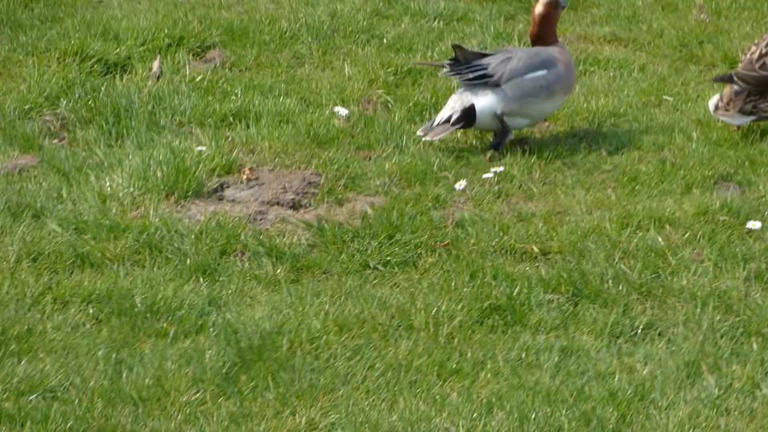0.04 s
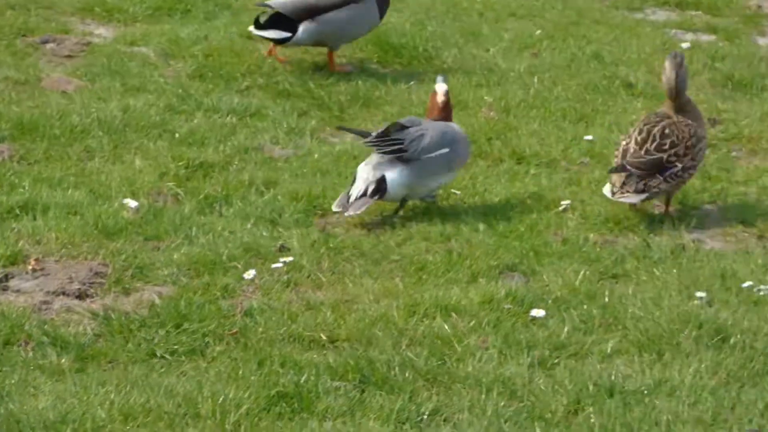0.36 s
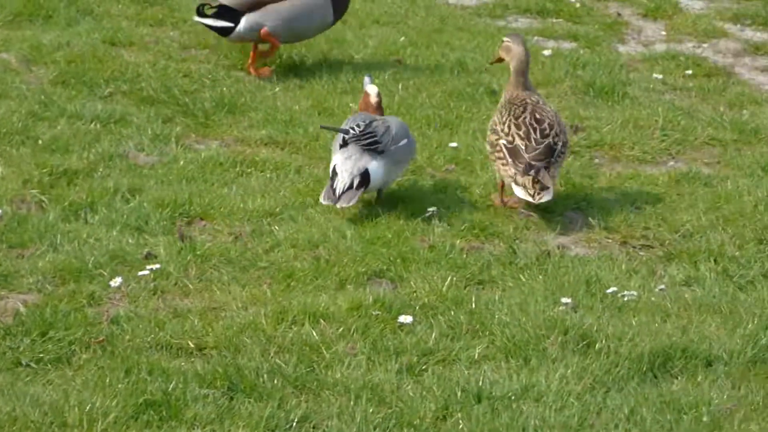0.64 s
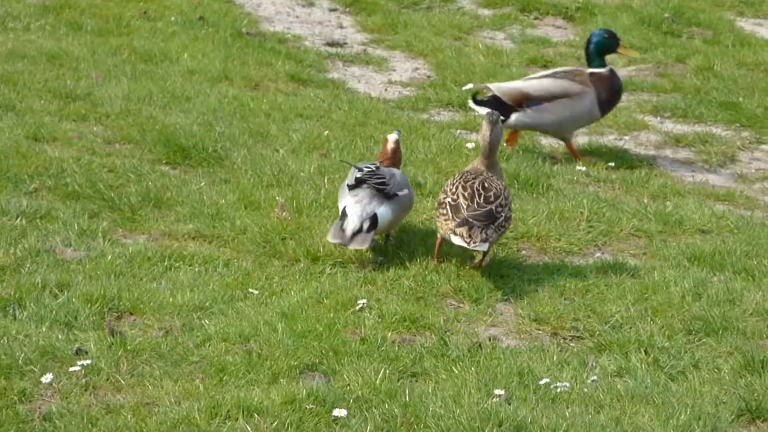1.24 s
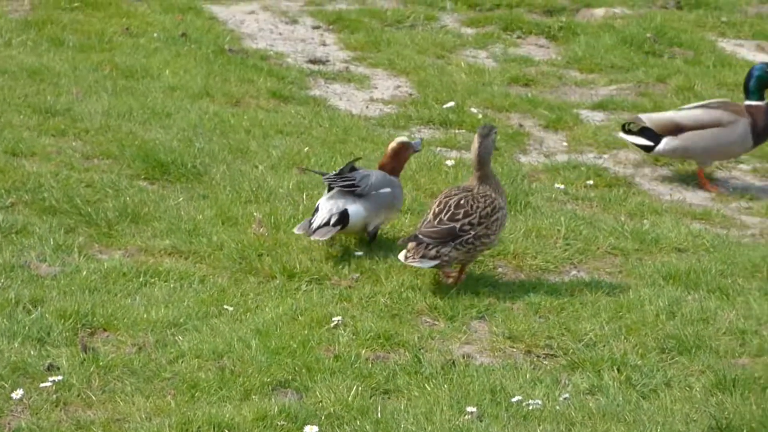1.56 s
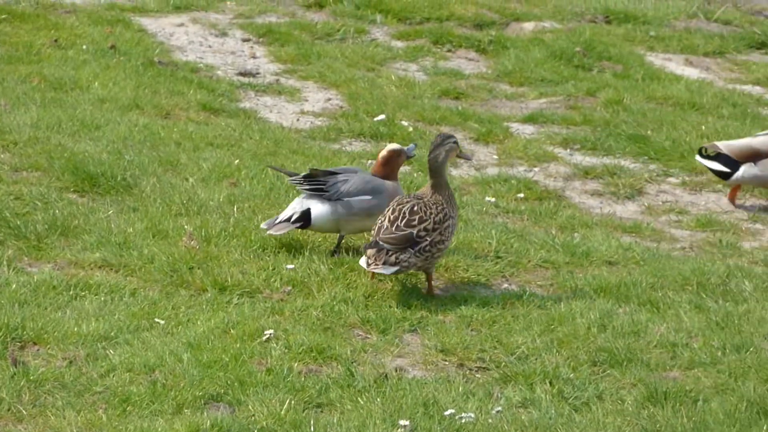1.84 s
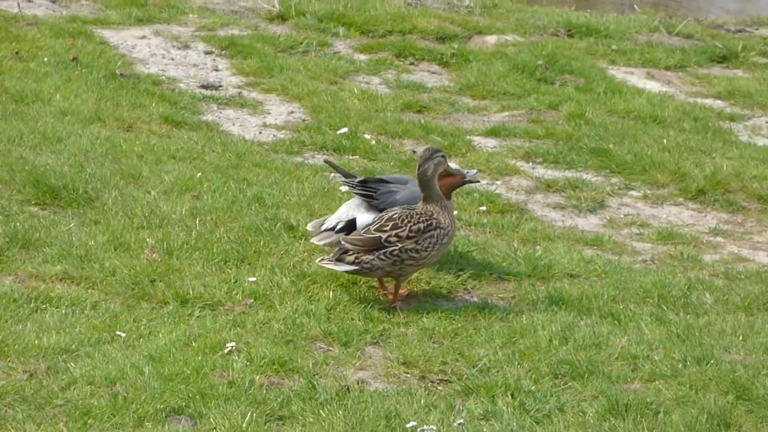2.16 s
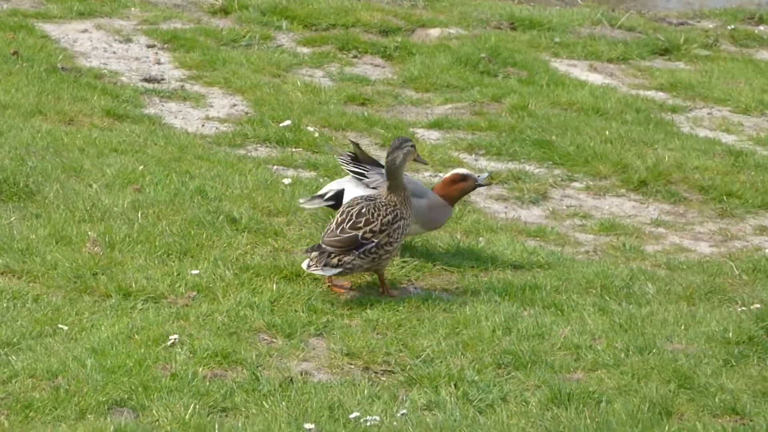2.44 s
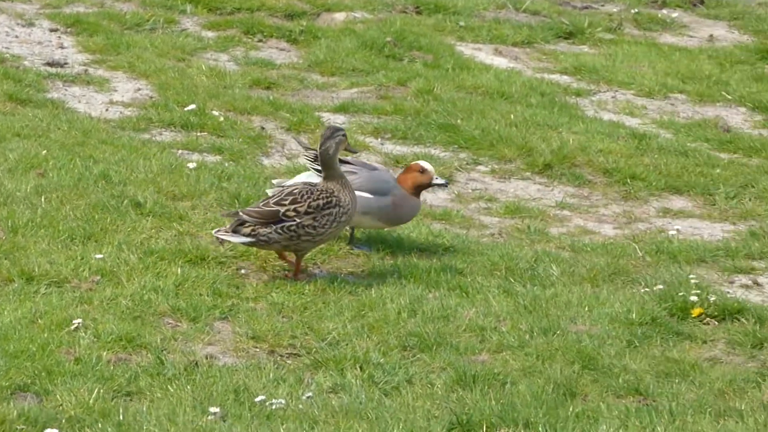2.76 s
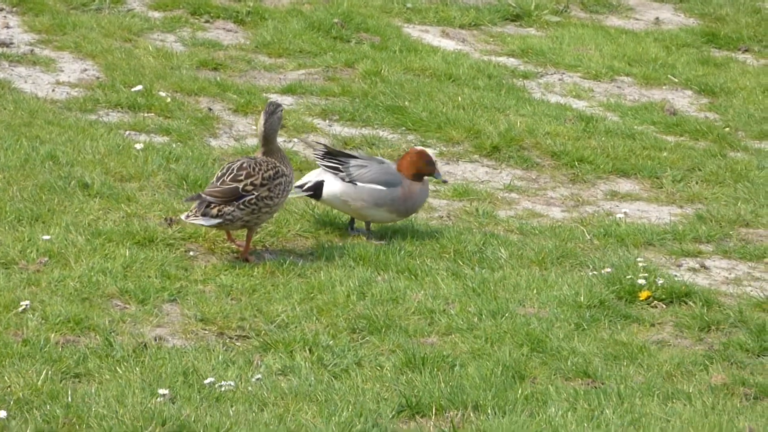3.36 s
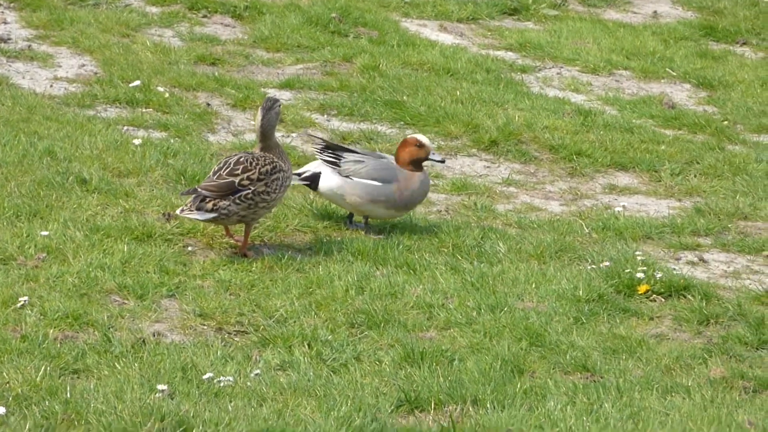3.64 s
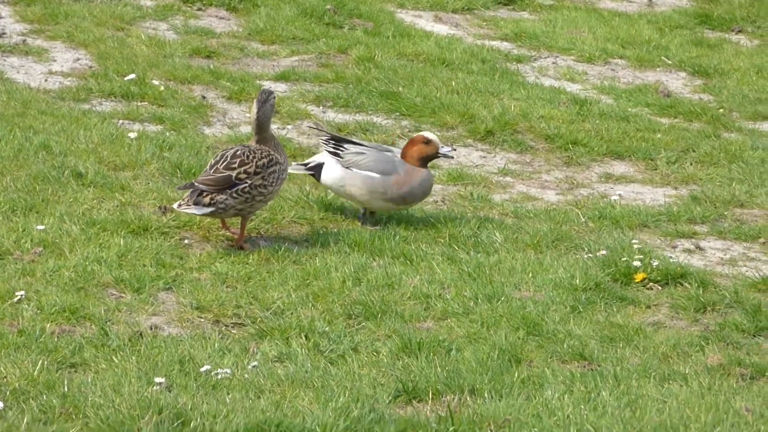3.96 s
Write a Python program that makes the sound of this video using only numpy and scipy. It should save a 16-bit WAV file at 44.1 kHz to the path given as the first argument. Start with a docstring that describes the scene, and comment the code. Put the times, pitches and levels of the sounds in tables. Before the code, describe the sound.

A run of short, rattling duck quacks with occasional whistles and some wind rumble.

```python
"""Short rattling quacks rise out of faint outdoor air and keep running as ducks walk over a lawn.
Each quack is a pulse train coloured by throat and beak; a second duck chatters and clucks more softly.
Beaks and feet tick and knock, and a wigeon adds three arched whistles, their pitch clinging to its
windpipe's resonances, and a few thin squeaks. Wind rumbles on the microphone in the second half,
and near the end a small bird pipes far off."""
import sys
import numpy as np
from scipy import signal
from scipy.fft import rfft, irfft, next_fast_len
from scipy.io import wavfile
from scipy.ndimage import map_coordinates

SR = 44100
rng = np.random.default_rng(int(sys.argv[2]) if len(sys.argv) > 2 else 0)


def unload_wav(signal):
    """Save mono or channel-first audio to the path in sys.argv[1] as 16-bit WAV at rate SR, clipped to [-1, 1]."""
    wavfile.write(
        sys.argv[1],
        SR,
        np.round(np.clip(np.atleast_2d(signal).T, -1, 1) * 32767).astype(np.int16),
    )


N = 176400


def amp(db):
    """Decibels to amplitude ratio."""
    return 10 ** (np.asarray(db) / 20)


def unit(x):
    """Normalisation to rms 1."""
    return x / np.sqrt(np.mean(x ** 2) + 1e-20)


def clock():
    """Sample times in seconds."""
    return np.arange(N) / SR


def along(points, hz):
    """Interpolation of (frequency_hz, value) points on a log frequency axis."""
    f, v = np.transpose(points)
    return np.interp(np.log(hz + 1), np.log(f + 1), v)


def filtered(x, response):
    """Linear filtering: the spectrum times a frequency response."""
    size = next_fast_len(N + SR // 2)
    return irfft(rfft(x, size) * response(np.fft.rfftfreq(size, 1 / SR)), size)[..., :N]


def colour(x, points):
    """Spectral shaping by a (frequency_hz, gain_db) curve."""
    return filtered(x, lambda hz: amp(along(points, hz)))


def noise(points):
    """Coloured noise of rms 1."""
    return unit(colour(rng.standard_normal(N), points))


def wobble(knots_per_s):
    """Smooth random modulation: a spline through Gaussian values."""
    return map_coordinates(rng.standard_normal(N // 8), [clock() * knots_per_s], mode="wrap")


def swell(dt, rise, fall, steep):
    """A rounded envelope: 1 at dt = 0, 1/e at -rise and +fall."""
    return np.exp(-np.minimum(np.abs(dt / np.where(dt < 0, rise, fall)), 10) ** steep)


def decay(start_s, t60_s):
    """Exponential decay from a sudden onset."""
    return (clock() >= start_s) * amp(-60 * np.abs(clock() - start_s) / t60_s)


def phase_of(hz):
    """Phase in radians, the integral of frequency."""
    return 2 * np.pi * np.cumsum(hz) / SR


def pan(x, db):
    """Direction by level difference; positive is left."""
    return x * amp([[db / 2], [-db / 2]])


def spread(points, side_db):
    """Partly coherent stereo noise from independent mid and side signals."""
    return unit(noise(points) + amp(side_db) * noise(points) * np.array([[1], [-1]]))


# spectrum of the outdoor air: frequency_hz, gain_db
AIR_SPECTRUM = [(60, -25.5), (190, 5), (330, -6), (900, -9), (1700, -6.5), (5000, -22.5), (9500, -25),
                (15500, -42)]
def air(level_db=-46.5):
    """Ambient noise: a broad spectrum whose level wavers slightly."""
    return amp(level_db + wobble(5.19)) * spread(AIR_SPECTRUM, side_db=-6.5)


# throat resonances and spectrum of the buzz: frequency_hz, gain_db
THROAT_RESPONSE = [(300, -30), (1300, -34), (1650, 0.5), (1850, -5.5), (2050, -2), (2450, -17.5),
                   (6000, -35)]
BUZZ_SPECTRUM = [(800, -18), (1350, -1), (2000, 0), (2380, -10), (2720, 3), (3100, -10), (3420, 0),
                 (3900, -26), (12000, -70)]
def rattle(calls, pulses_per_s, beak_response, steep, rasp_db, buzz_db):
    """Source and filter: each pulse is a throat tone burst, a buzz and a bright slap through the beak."""
    jitter_s, scatter_db, pitch_scatter, sag_per_s = .0005, 1.8, .055, 1.0
    burst_s, afterbeat_delay_s, afterbeat_db, buzz_s = .0017, .0032, -16, .0017
    slap_s, slap_delay_s, sweep_hz, sweep_hz_per_s = .0021, .0023, 4500, 1500000
    tone, buzz, rasp = np.zeros((3, N + SR))
    t = np.arange(-SR // 100, SR // 100) / SR
    slap_t = t - slap_delay_s
    slap_shape = swell(slap_t, slap_s, 1.4 * slap_s, 1.1)
    buzz_shape = swell(t - slap_delay_s / 2, buzz_s, 1.4 * buzz_s, 1.3)
    afterbeat_shape = swell(t - afterbeat_delay_s, burst_s, burst_s, 2)
    for peak_s, rise, fall, db, hz, bright_db in calls:
        for pulse in range(-8, 9):
            jitter, size, detune, length, flick, phase, rebound = rng.standard_normal(7)
            dt = pulse / pulses_per_s + jitter_s * jitter
            force = swell(dt, rise, fall, steep)
            gain = amp(db + scatter_db * size) * force
            cycles = hz * (1 + pitch_scatter * detune - sag_per_s * dt) * t
            burst_shape = swell(t, burst_s * np.exp(length / 4), burst_s, 2)
            burst = burst_shape * np.sin(2 * np.pi * (cycles + phase))
            afterbeat = afterbeat_shape * np.sin(2 * np.pi * (cycles + flick))
            sweep_cycles = sweep_hz * slap_t + sweep_hz_per_s * np.exp(flick / 2) * slap_t ** 2 / 2
            sweep = np.sin(2 * np.pi * (sweep_cycles + phase))
            slap = slap_shape * (rng.standard_normal(len(t)) + sweep / 2)
            first = round((peak_s + dt) * SR) - len(t) // 2
            span = slice(first, first + len(t))
            tone[span] += 2.34 * gain * (burst + amp(afterbeat_db + 3 * rebound) * afterbeat)
            buzz[span] += gain * amp(buzz_db + .13 * bright_db) * buzz_shape * rng.standard_normal(len(t))
            rasp[span] += gain * force ** .5 * amp(rasp_db + bright_db) * slap
    return (colour(tone[:N], THROAT_RESPONSE) + colour(buzz[:N], BUZZ_SPECTRUM)
            + colour(rasp[:N], beak_response))


# first duck's calls: peak_s, rise_s, fall_s, relative_level_db, throat_hz, brightness_db
QUACK_CALLS = [(.334, 0.06, 0.047, -35, 1760, -11), (.4605, 0.032, 0.038, -24.5, 1820, -4),
               (.618, 0.053, 0.032, -25, 1806, -5.5), (.910, 0.052, 0.021, -26.5, 1774, -0.5),
               (1.050, 0.037, 0.052, -26.5, 1776, -0.5), (1.369, 0.046, 0.033, -27, 1840, 0),
               (1.533, 0.05, 0.029, -27, 1820, -1), (1.819, 0.055, 0.032, -25.5, 1885, -1),
               (1.991, 0.054, 0.039, -25.5, 1850, -0.5), (2.267, 0.043, 0.038, -27, 1890, -6.5),
               (2.451, 0.036, 0.064, -25, 1900, -7), (2.756, 0.065, 0.018, -27.5, 1770, -8),
               (2.877, 0.041, 0.056, -26.5, 1946, -8), (3.170, 0.048, 0.033, -25, 1905, -13.5),
               (3.328, 0.057, 0.042, -27, 1947, -8.5), (3.604, 0.045, 0.033, -25, 1833, -11),
               (3.792, 0.048, 0.035, -25, 1946, -7)]
# its beak resonances: frequency_hz, gain_db
QUACK_BEAK_RESPONSE = [(500, -14), (900, -22.5), (1350, 2), (2300, -4), (3400, -13.5), (4000, -18),
                       (4600, -12), (4830, -14), (5200, -7), (5550, -14.5), (6200, -6.5), (7200, -17),
                       (8500, -22), (15000, -82)]
def quacks():
    """Pulse trains slow enough to be heard as a rattle."""
    return rattle(QUACK_CALLS, 113, QUACK_BEAK_RESPONSE, steep=3.14, rasp_db=6, buzz_db=3)


# sharp contacts of beaks and feet: start_s, relative_level_db
TICK_IMPACTS = [(0.418, -36.5), (0.7003, -27.5), (3.253, -36), (3.733, -40)]
def ticks(t60_s=.011, gain_db=-2.5):
    """Impact transients: broadband noise that decays almost at once."""
    crack = noise([(200, -6), (2000, 4.5), (8500, -4), (14000, -17)])
    return crack * sum(amp(db + gain_db) * decay(start_s, t60_s) for start_s, db in TICK_IMPACTS)


# second duck's calls: peak_s, half_length_s, relative_level_db
CHATTER_CALLS = [(.548, 0.041, -43), (0.699, 0.036, -43.5), (0.835, 0.041, -44), (1.199, 0.036, -40.5),
                 (1.427, 0.036, -37.5), (1.577, 0.041, -37.5), (1.713, 0.047, -38.5), (2.104, 0.033, -40),
                 (2.217, 0.036, -39.5), (3.092, 0.075, -39.5), (3.534, 0.063, -40), (3.931, 0.025, -41.5)]
# its beak resonances: frequency_hz, gain_db
CHATTER_BEAK_RESPONSE = [(500, -21.5), (1250, 1.5), (2200, 11.5), (2900, -0.5), (3600, -15.5), (5500, -9),
                         (6500, -5.5), (7800, -17.5), (15000, -48)]
def chatter(throat_hz=2166, dulling_db_per_s=2.5):
    """Softer pulse trains whose rasp weakens from call to call, dulling the timbre."""
    calls = [(s, half, half, db, throat_hz, -dulling_db_per_s * s) for s, half, db in CHATTER_CALLS]
    return rattle(calls, 103, CHATTER_BEAK_RESPONSE, steep=5.3, rasp_db=10, buzz_db=9)


# wigeon's calls: crest_s, rise_s, fall_s, crest_hz, relative_level_db, hiss_db, pan_db
WHISTLE_ARCHES = [(0.634, 0.034, 0.028, 2923, -30, -9.5, 2), (1.655, .035, 0.024, 2716, -34, -16, 1.6),
                  (2.804, .031, .027, 2983, -30.5, -5.5, 1.5)]
# harmonics 2 to 4: relative_level_db
WHISTLE_HARMONICS = [-5.5, -13, -30]
# beak resonances and spectrum of the hiss: frequency_hz, gain_db
WHISTLE_BEAK_RESPONSE = [(2000, 8.5), (3000, 2.5), (3700, 3.5), (5000, 1.5), (5900, -8.5), (7300, -23),
                         (9300, 9), (12000, 7.5), (13000, -35)]
HISS_SPECTRUM = [(1000, -6), (5000, -0.5), (8000, 2.5), (9600, 5), (10700, -16), (12000, -13), (13000, -60)]
def whistles(foot_hz=1189, jump_hz=2030, spacing_hz=650, pull_hz=75, roughness=.012):
    """Frequency pulling: an arching pitch clings to the windpipe's resonances and jumps between them."""
    out = np.zeros((2, N))
    for crest_s, rise, fall, crest_hz, db, hiss_db, pan_db in WHISTLE_ARCHES:
        dt = clock() - crest_s
        arch_hz = foot_hz + (crest_hz - foot_hz) * swell(dt, rise, fall, 2.2)
        mode_angle = 2 * np.pi * (arch_hz - jump_hz) / spacing_hz
        pitch_hz = arch_hz + pull_hz * (np.sin(mode_angle) + np.sin(2 * mode_angle) / 2)
        phase = phase_of(pitch_hz * (1 + roughness * wobble(1100)))
        overtones = sum(amp(level + 3 * wobble(400)) * np.sin(k * phase)
                        for k, level in enumerate(WHISTLE_HARMONICS, 2))
        tone = np.sqrt(2) * (np.sin(phase) + overtones)
        flutter = amp(1.2 * wobble(200) + 1.2 * wobble(1200))
        voice = colour(tone * flutter * swell(dt, .93 * rise, .93 * fall, 3.8), WHISTLE_BEAK_RESPONSE)
        hiss = amp(hiss_db) * noise(HISS_SPECTRUM) * swell(dt, 1.16 * rise, 1.16 * fall, 4.8)
        out += pan(amp(db) * (voice + hiss), pan_db)
    return out


def thin_notes(notes, harmonics_db, roughness, hiss_db):
    """Frequency and amplitude modulation: fluttering tones on a shallow pitch arch, in a puff of hiss."""
    out = np.zeros(N)
    hiss = amp(hiss_db) * noise(HISS_SPECTRUM)
    waver = 1 + roughness * wobble(700)
    flutter = amp(2 * wobble(250))
    for crest_s, half, crest_hz, width, db in notes:
        dt = clock() - crest_s
        phase = phase_of(crest_hz * swell(dt, width, width, 2) * waver)
        tone = sum(amp(level) * np.sin(k * phase) for k, level in enumerate(harmonics_db, 1))
        puff = hiss * swell(dt, 1.6 * half, 1.6 * half, 3)
        out += amp(db) * flutter * (np.sqrt(2) * tone * swell(dt, half, half, 5) + puff)
    return out


# wigeon's squeaks: crest_s, half_length_s, crest_hz, arch_half_width_s, relative_level_db
SQUEAK_NOTES = [(.66, 0.027, 1440, 0.081, -45), (.805, 0.048, 1484, 0.1, -42.5),
                (.962, 0.029, 1327, 0.13, -43), (2.968, 0.027, 1500, 0.058, -43)]
# harmonics 1 to 6: relative_level_db
SQUEAK_HARMONICS = [-3, 0, -30, -25, -26, -20]
def squeaks():
    """A harmonic series that sounds thin, its octave stronger than its fundamental."""
    return thin_notes(SQUEAK_NOTES, SQUEAK_HARMONICS, roughness=.0021, hiss_db=-11)


# dull contacts of beaks and feet: start_s, relative_level_db, pitch_hz
KNOCK_IMPACTS = [(0.702, -35.5, 483), (1.05, -37, 617)]
def knocks(t60_s=.074, gain_db=6, roughness=.21):
    """Damped oscillation: each impact rings briefly at a low, blurred pitch."""
    out = np.zeros(N)
    for start_s, db, hz in KNOCK_IMPACTS:
        pitch_hz = (clock() >= start_s) * hz * (1 + roughness * wobble(610))
        out += amp(db + gain_db) * decay(start_s, t60_s) * np.sin(phase_of(pitch_hz))
    return out


# gusts on the microphone: peak_s, half_length_s, relative_level_db
WIND_GUSTS = [(1.17, 0.12, -52), (2.28, 0.57, -51), (2.483, 0.019, -35.5), (2.567, 0.042, -39),
              (2.72, 0.067, -37), (2.894, 0.14, -37), (3.079, 0.021, -42.5), (3.389, 0.096, -36.5),
              (3.653, 0.44, -53), (3.9, 0.023, -40.5)]
# spectrum of their rumble: frequency_hz, gain_db
WIND_SPECTRUM = [(25, -61), (60, -20.5), (140, 3.5), (310, 0), (500, -9.5), (1000, -27.5), (3000, -53)]
def wind(lumps_db=2, gain_db=4):
    """Turbulent pressure: lumpy gusts add in power and are nearly incoherent at the microphone's ports."""
    power = sum((amp(db) * swell(clock() - s, half, half, 2.84)) ** 2 for s, half, db in WIND_GUSTS)
    return np.sqrt(power) * amp(gain_db + lumps_db * wobble(45)) * spread(WIND_SPECTRUM, side_db=-2)


# second duck's clucks: peak_s, half_length_s, relative_level_db
CLUCK_NOTES = [(1.261, 0.024, -35), (1.47, 0.0099, -34.5), (1.891, 0.0067, -32), (2.195, 0.021, -35),
               (2.364, 0.0075, -37), (2.589, 0.017, -33), (2.95, 0.022, -38)]
def clucks(pitch_hz=1590, fall_per_s=2, octave_db=-22):
    """Jitter and shimmer: fast random changes of pitch and level make short notes hoarse."""
    out = np.zeros(N)
    waver, flutter_db = .11 * wobble(1300), 4.5 * wobble(500)
    for peak_s, half, db in CLUCK_NOTES:
        dt = clock() - peak_s
        phase = phase_of(pitch_hz * (1 - fall_per_s * dt + waver))
        tone = np.sin(phase) + amp(octave_db) * np.sin(2 * phase)
        out += amp(db + flutter_db) * swell(dt, half, half, 2.3) * tone
    return out


# small bird's note: crest_s, half_length_s, crest_hz, arch_half_width_s, level_db
FAR_BIRD_NOTES = [(3.69, 0.059, 3380, 0.29, -53.5)]
def far_bird():
    """A nearly pure tone, faint with distance."""
    return thin_notes(FAR_BIRD_NOTES, [0], roughness=.0045, hiss_db=-35)


def convolved(x, impulse):
    """Convolution with a stereo impulse response, scaled to unit energy on the left."""
    return signal.fftconvolve(x, impulse / np.linalg.norm(impulse[0]), axes=1)[:, :N]


def lawn_reflection(x, scatter_s=.0012):
    """Scattering: the lawn returns a very short reflection, different in each channel."""
    t = np.arange(SR // 100) / SR
    return convolved(x, rng.standard_normal((2, len(t))) * t * np.exp(-2 * t / scatter_s))


# reverberation time of the surroundings: frequency_hz, t60_s
YARD_DECAY = [(300, 0.56), (10000, 0.017)]
def yard_reverb(x):
    """Diffuse reverberation: a noise tail whose treble decays fastest."""
    hz, t, spectra = signal.stft(rng.standard_normal((2, SR // 2)), SR, nperseg=256)
    fading = amp(-60 * t / along(YARD_DECAY, hz)[:, None])
    return convolved(x, signal.istft(spectra * fading, SR, nperseg=256)[1])


def scene():
    """Superposition: ducks close together, nearly straight ahead, with reflections, bird, wind and air."""
    ducks = pan(quacks(), db=-2.5) + pan(chatter(), db=6.3)
    ducks += pan(clucks() + ticks() + knocks(), db=3)
    ducks += whistles() + pan(squeaks(), db=2)
    bird = far_bird()
    reflections = amp(-14) * lawn_reflection(ducks) + amp(-21) * yard_reverb(ducks + bird)
    return ducks + bird + reflections + pan(wind(), db=-4) + air()


def record(dry, start_s=.306, dc_offset=-.0044, notch_hz=402, notch_width_hz=32, top_hz=15800):
    """A band-limited channel: it opens after a moment, with a narrow notch, an offset and a faint whine."""
    def notch(hz):
        """Antiresonance: the response falls to zero at notch_hz."""
        detuning = notch_hz ** 2 - hz ** 2
        return detuning / (detuning + 1j * hz * notch_width_hz)

    whine = amp(-82) * np.sin(2 * np.pi * 15625 * clock())
    gated = (filtered(dry, notch) + whine + dc_offset) * (clock() >= start_s)
    return filtered(gated, lambda hz: hz < top_hz)


dry = scene()
out = record(dry)
unload_wav(out)
```